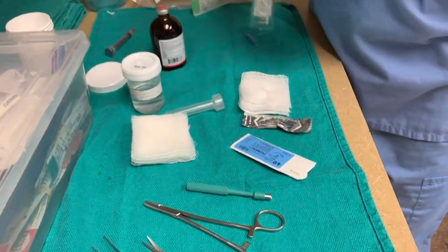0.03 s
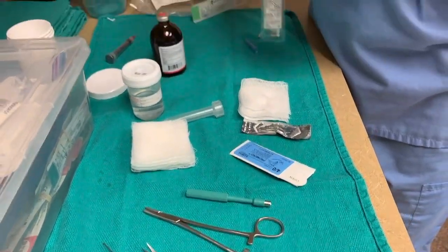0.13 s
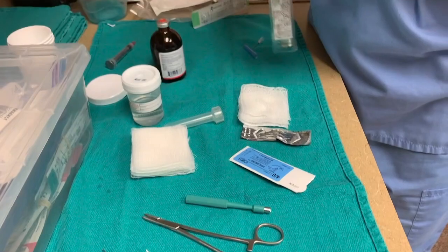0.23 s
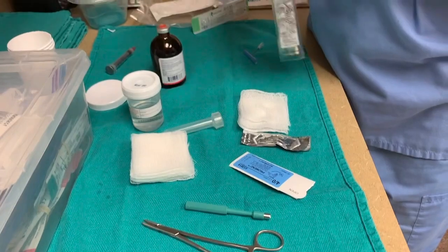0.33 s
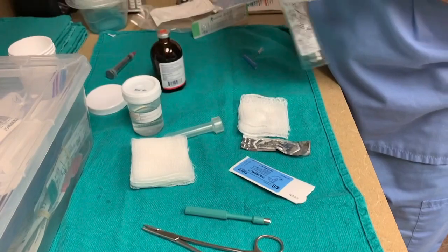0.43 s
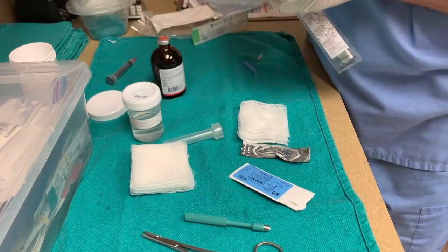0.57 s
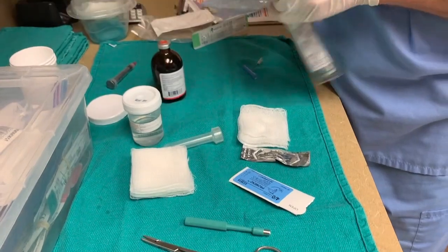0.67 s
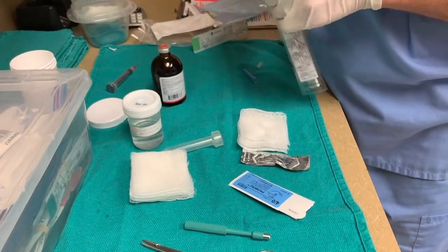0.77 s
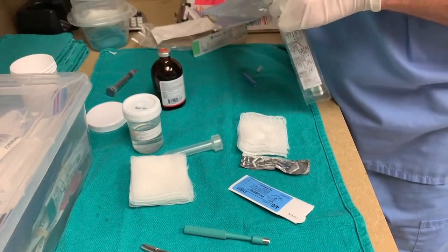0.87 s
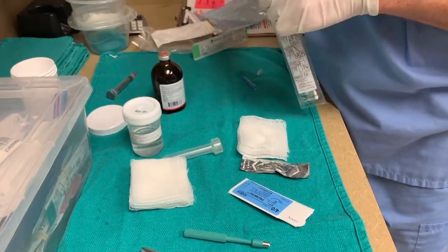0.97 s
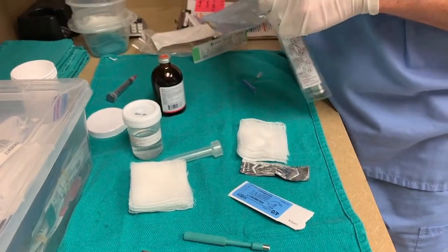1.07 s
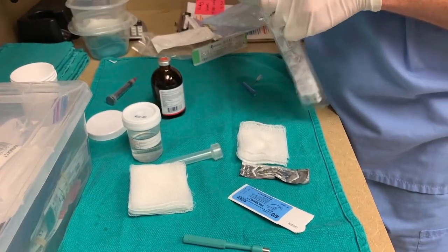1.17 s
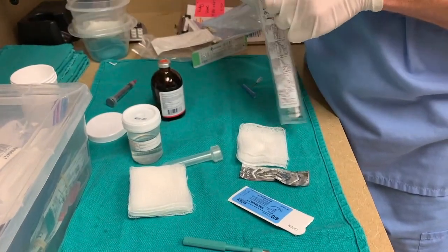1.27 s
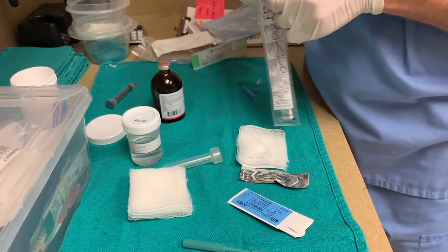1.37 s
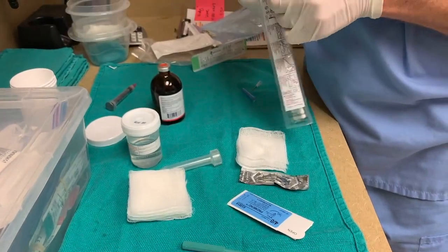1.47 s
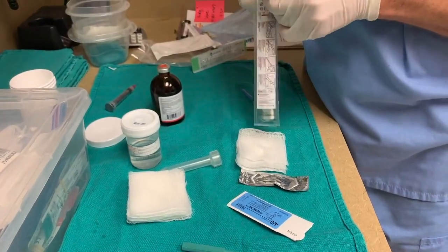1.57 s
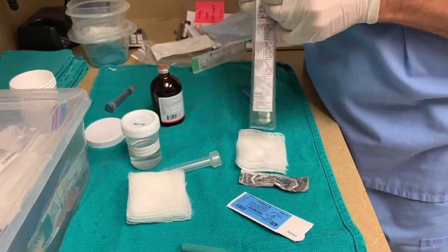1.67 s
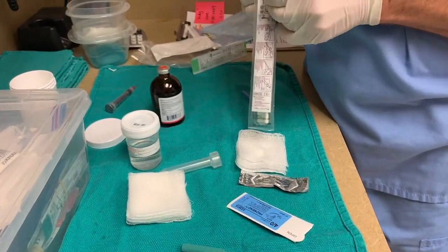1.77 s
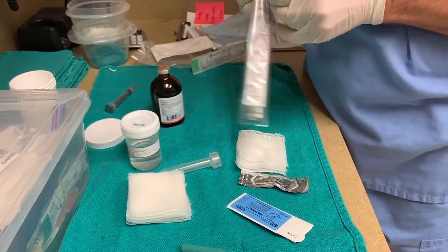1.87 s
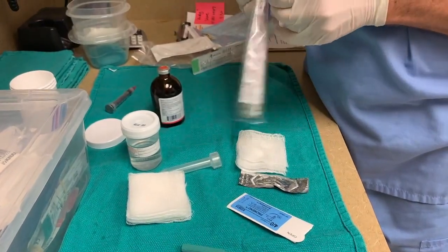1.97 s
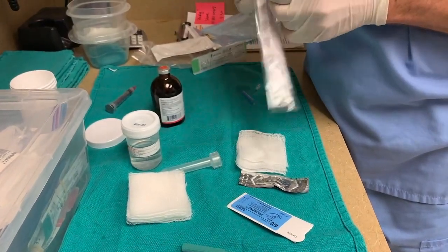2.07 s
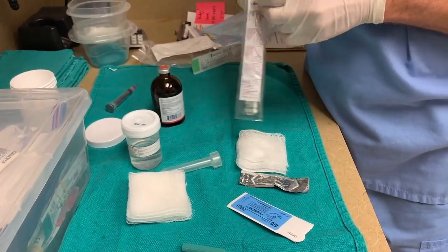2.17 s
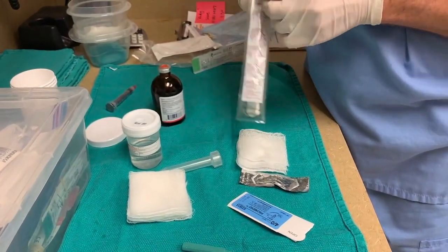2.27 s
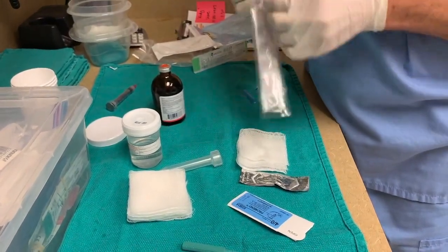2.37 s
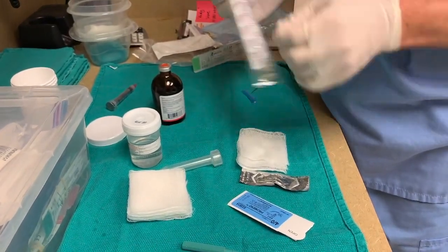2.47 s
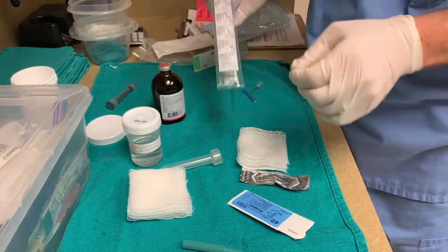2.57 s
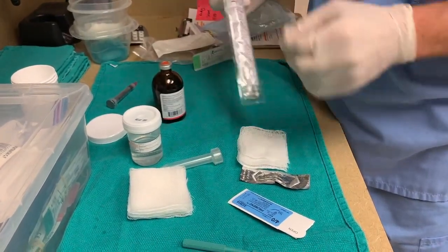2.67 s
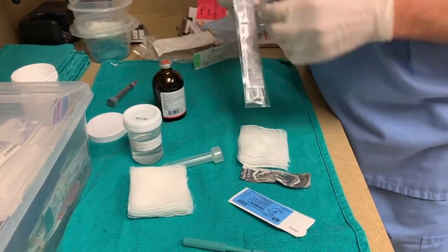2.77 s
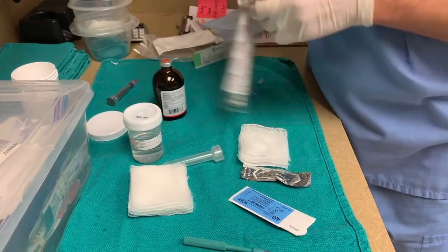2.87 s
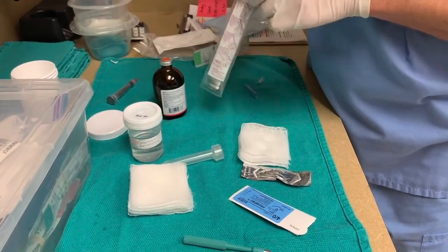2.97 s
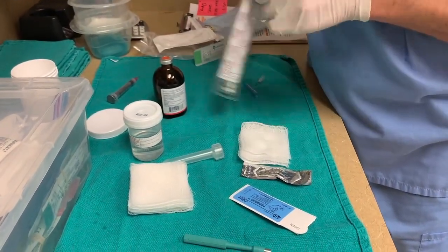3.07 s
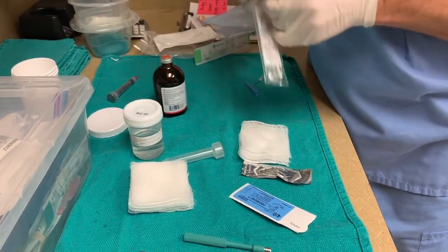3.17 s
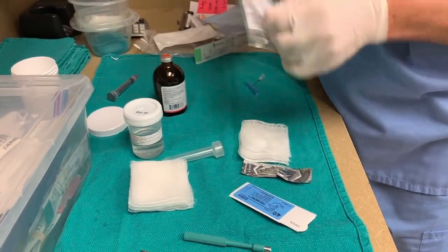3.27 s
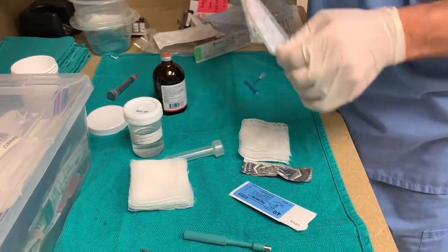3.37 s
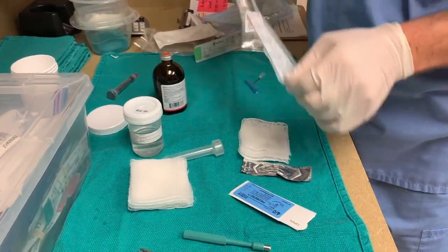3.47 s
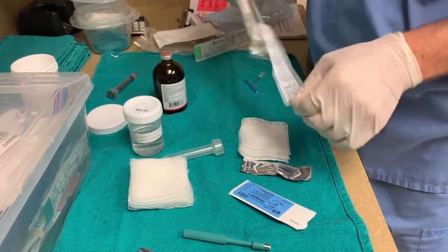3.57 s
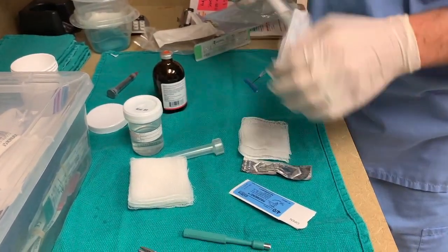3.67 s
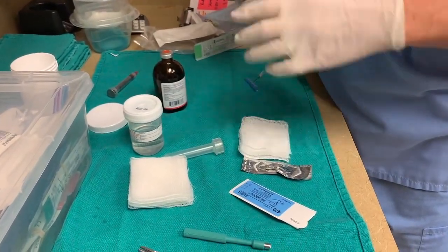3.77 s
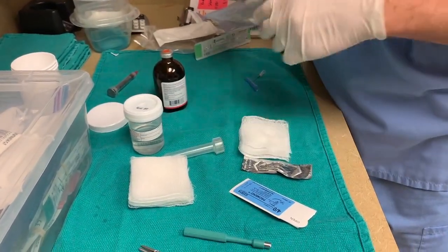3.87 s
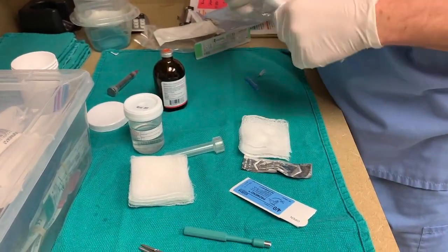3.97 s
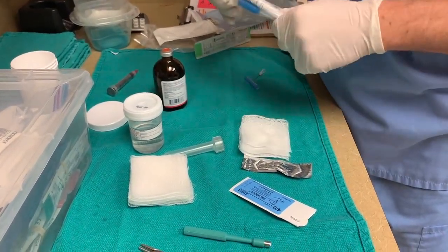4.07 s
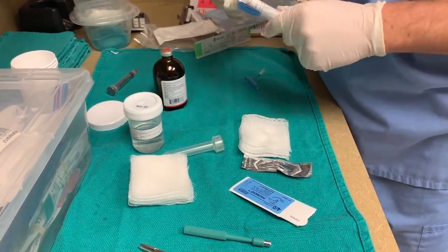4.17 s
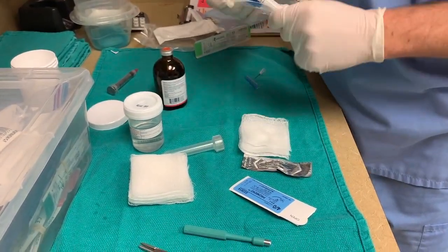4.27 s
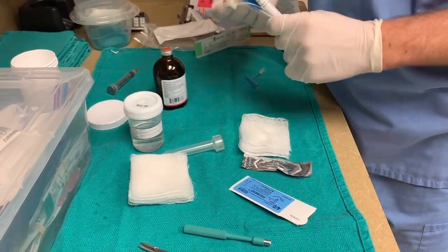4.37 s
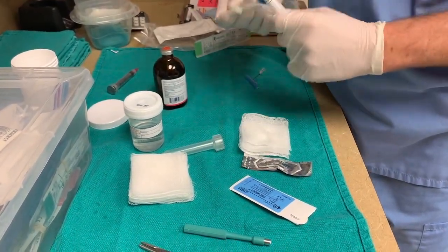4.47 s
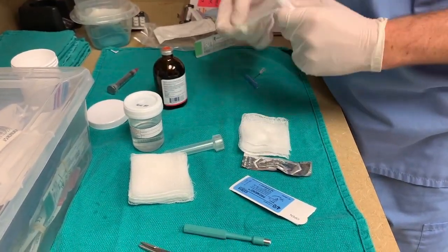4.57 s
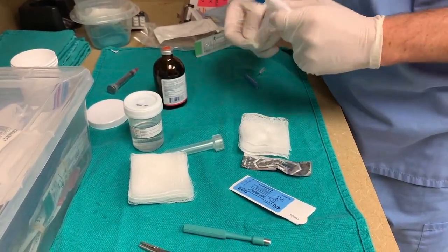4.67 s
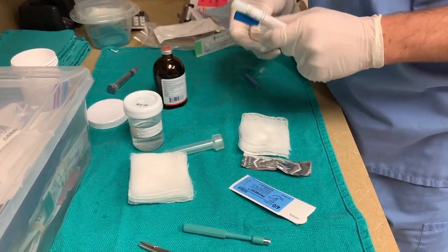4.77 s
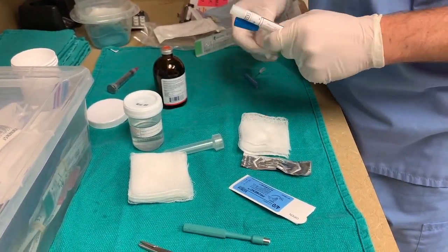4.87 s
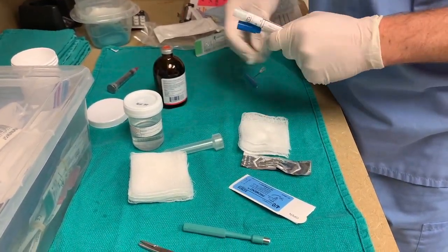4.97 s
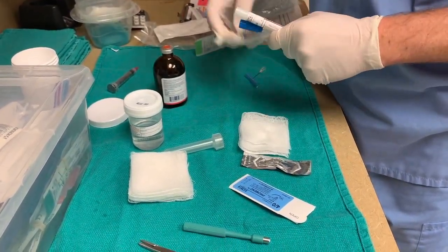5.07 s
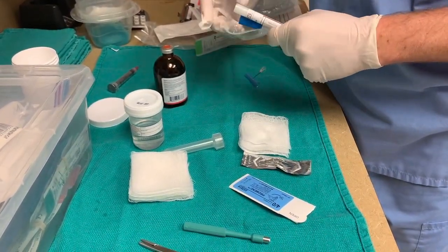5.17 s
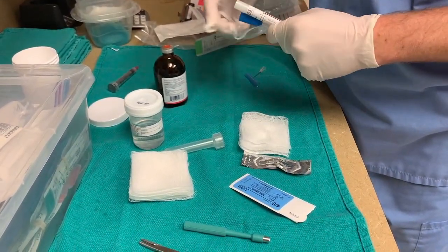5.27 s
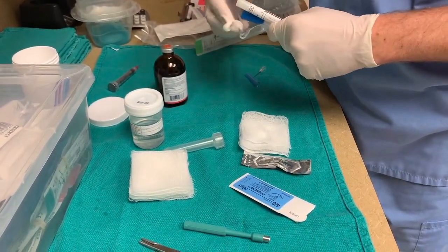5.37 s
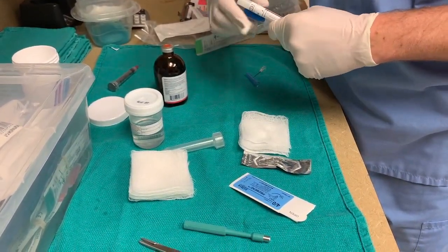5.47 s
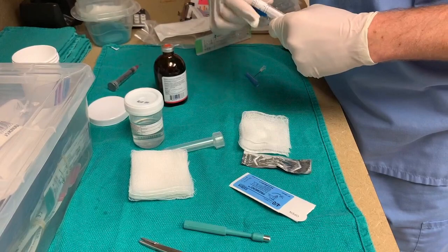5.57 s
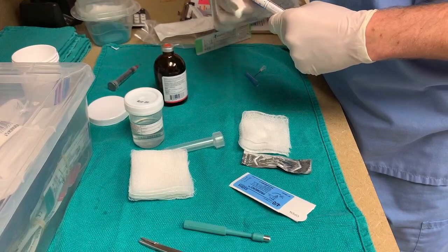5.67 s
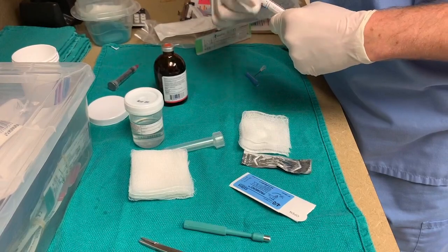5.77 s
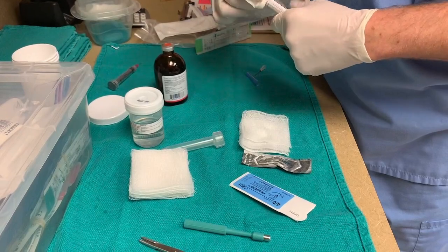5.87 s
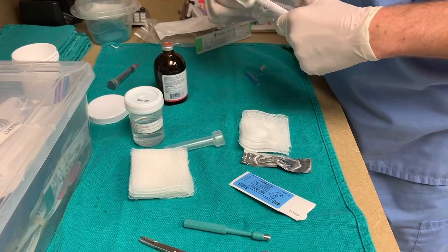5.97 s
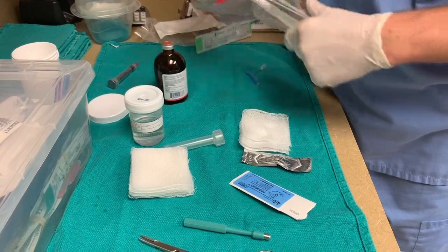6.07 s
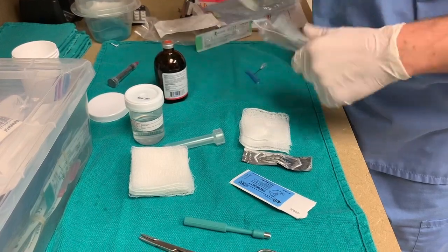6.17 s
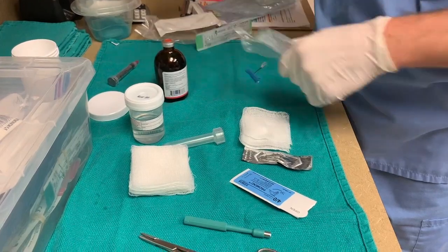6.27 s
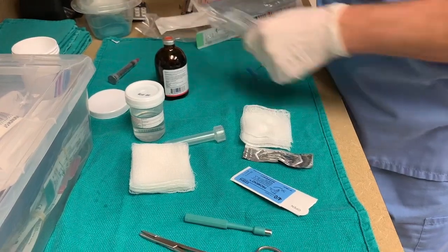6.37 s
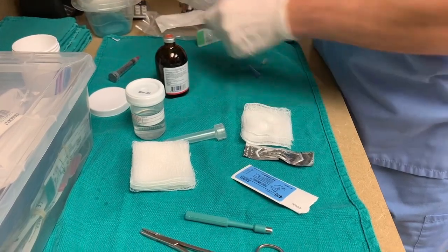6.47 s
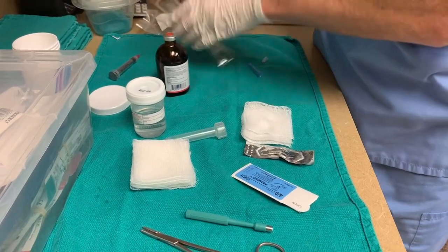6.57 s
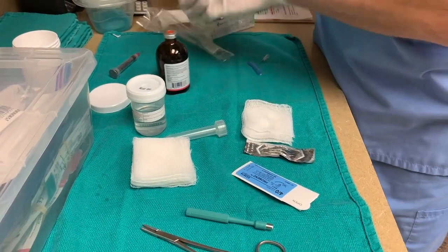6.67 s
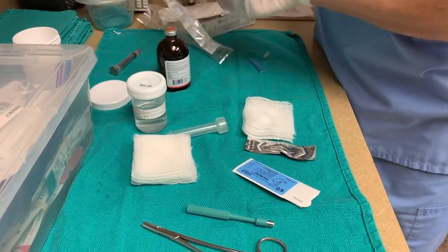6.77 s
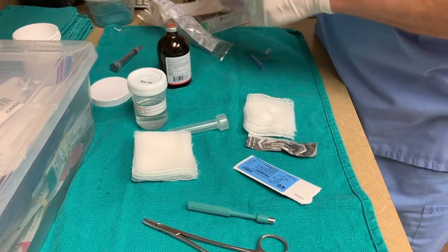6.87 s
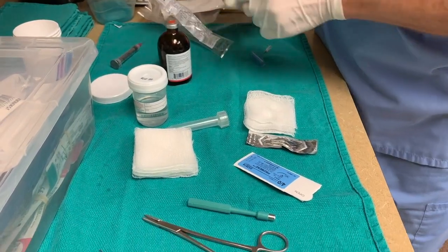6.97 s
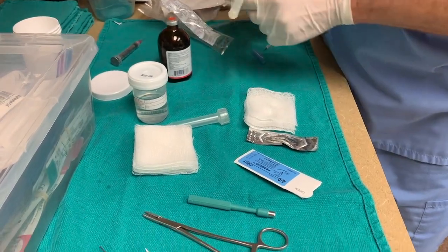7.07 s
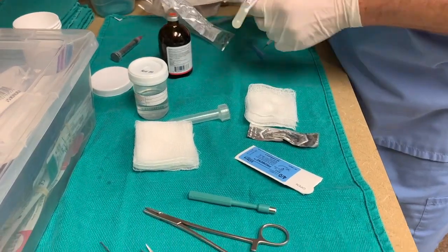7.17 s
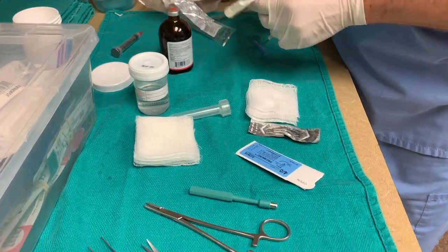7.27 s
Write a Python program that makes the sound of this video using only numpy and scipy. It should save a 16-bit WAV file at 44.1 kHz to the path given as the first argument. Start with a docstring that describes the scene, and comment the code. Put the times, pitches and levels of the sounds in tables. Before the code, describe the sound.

In a small, lightly reverberant clinic room, a steady low hum near 120 hertz sits over soft, deep ventilation rumble. Close and slightly right, gloved hands turn a stiff film-and-paper pouch. From 0 to 0.9 s there are light, separated crinkles and ticks, then near quiet until 1.45. Snaps gather and sharpen from 1.5 to 2.35, with a tiny squeaky slip at 2.0. At 2.4 comes the loudest single crack, with a hollow sheet pop. A sparse gap follows, with one snap at 2.85. From about 3.1 to 3.4 the seal rips open: dense breaking fibres and a squeal gliding up, then down. Bright crackling, papery rustle and faint rubber scrapes continue from 3.45 to 4.8, densest around 4.5. A sharp snap lands at 5.1, another at 5.47, and a crackling cluster at 5.8-6.3 with a muted pop. Small soft crinkles and a slight rub fade by 6.8, leaving the hum.

```python
"""A small clinic room: gloved hands turn a sterile paper-and-film pouch and peel it open, right of a two-port phone.
The stiff film buckles in sharp snaps, made of filtered noise and ringing facets, amid crinkle from tiny random creases.
The seal parts in a gliding stick-slip squeal and a rush of breaking fibres; gloves scrape and the taut sheet pops.
Reverberation of shaped noise surrounds the pouch, over a hum tone and low-heavy noise for the ventilation."""
import sys
import numpy as np
from scipy import signal
from scipy.fft import rfft, irfft, next_fast_len
from scipy.io import wavfile
from scipy.ndimage import uniform_filter1d

SR = 44100
rng = np.random.default_rng(int(sys.argv[2]) if len(sys.argv) > 2 else 0)


def master(y):
    """Save y as 16-bit WAV."""
    cut = np.clip(np.atleast_2d(y).T, -1, 1)
    pcm = np.round(cut * 32767)  # scale
    wavfile.write(sys.argv[1], SR, pcm.astype(np.int16))


N = 322371
TIME = np.arange(N) / SR

# Colour of the sheet's body. Each row: frequency in Hz, level in dB.
BODY_COLOUR = [(100, -24.5), (220, -8), (400, 0.5), (540, 5.5), (660, -7.5), (800, 3.5), (1200, 11),
               (1600, 3.5), (3000, -38)]
# Centres of the overlapping noise bands, in Hz.
BAND_HZ = [250, 600, 1200, 2200, 3800, 6500, 10000, 15000]
# How alike sound from the crumpled sheet is at the two ports. Each row: frequency in Hz, likeness from 0 to 1.
LIKENESS = [(150, .95), (500, .78), (1200, .68), (2200, .45), (4000, .36), (6500, .3), (8500, .6),
            (10500, .85), (14000, .9)]


def snaps(body_db=-4.0, crack_db=0, edge_db=-1, facet_db=-4, main_db=-3, spike_db=-4,
          lead_db=-15, lead_s=0.0034, lead_edge_db=-7):
    """Each crease has a soft noise lead-in, buckles with a crack, rings one large and several lesser facets."""
    # Buckles of the film. Each row: start in seconds, crack level in dB, sheet body and bright edge
    # in dB relative to the crack before the common trims above, facet pitch in Hz.
    buckles = [(0.071, -58.5, -10, -0.5, 3080), (.161, -65, -22, 5, 3860), (.281, -41.5, -8, -7, 1950),
               (0.3294, -52.5, -10, 8, 4860), (0.343, -46, 1, 9, 4320), (.458, -45, -5, -2, 3440),
               (0.52, -45, -9, -4.5, 3530), (0.575, -59.5, -1, -19, 2380), (0.5948, -57.5, -3, 2, 3900),
               (0.6918, -42, -10, 2, 2410), (0.7181, -47.5, -4, 11.5, 4650), (.778, -38.5, -9, -9.5, 3100),
               (0.8807, -53.5, -5, -1.5, 3000), (1.084, -61.5, -16, 3.5, 1200),
               (1.254, -54, -31, -34, 2510), (1.467, -45.5, 3.5, -6.5, 1790), (1.507, -39.5, -18, -5, 3100),
               (1.529, -50.5, -6, 16, 4600), (1.569, -39, -30, -6.5, 2600), (1.616, -36, -4, -11, 1910),
               (1.775, -54.5, -4, -4.5, 3000), (1.827, -41.5, -4, 5, 3260), (1.837, -43, -6, -9, 3640),
               (1.917, -46, -12, -14, 1880), (1.8514, -30.5, -6.5, -1.5, 2120),
               (1.9782, -34, -1, -13, 4240), (2.022, -38.5, -6.5, 4, 1080), (2.034, -38.5, -18.5, -1, 3030),
               (2.064, -40, -8, -4, 4430), (2.12, -38.5, -12, -9, 3550), (2.1274, -33, -11.5, 7.5, 4260),
               (2.149, -41, 0.5, -15, 2570), (2.267, -47.5, -0.5, 4.5, 2800), (2.3455, -34, -9.5, 0, 3400),
               (2.375, -21.5, 0.5, 0, 3340), (2.418, -34.5, -7, 8.5, 3740),
               (2.5538, -45, -19.5, -4.5, 2200), (2.848, -36, -3.5, -1, 2680), (2.986, -67, 2, 12, 3000),
               (3.023, -57.5, 2, 15.5, 4200), (3.039, -50, -8, 3, 2560), (3.057, -39, -3, 0.5, 2190),
               (3.0913, -38, -1.5, -1, 2860), (3.174, -36.5, -15, 10, 2210), (3.299, -38, -1, 18.5, 3600),
               (3.315, -32.5, -16, 16.5, 3100), (3.3204, -32.5, -11, 16, 3245),
               (3.483, -34.5, -1, -6, 4050), (3.502, -40.5, 5, 7, 3570), (3.568, -52.5, -6, 3, 2080),
               (3.602, -45, -6, -20, 1830), (3.6343, -39, -2, 1.5, 3050), (3.707, -38, -5.5, -3.5, 3880),
               (3.727, -42.5, 3, 2.5, 3050), (3.744, -48.5, -13, 7, 4270), (3.79, -55.5, 6, 4, 1690),
               (3.8356, -53.5, -8, 7, 1720), (3.8773, -46.5, 2, .5, 3050), (3.899, -42, 0, 2.5, 2220),
               (3.913, -39, -5.5, 6, 3320), (3.971, -47.5, -8, 6, 3200), (3.9984, -40.5, -5, 6, 3260),
               (4.073, -55, -2, 9, 3240), (4.1365, -42, -7, 7.5, 4520), (4.166, -47, -6, 1, 3060),
               (4.204, -46.5, -4.5, 2, 4300), (4.227, -42, -5, -2, 3220), (4.252, -42, -27, 8.5, 5700),
               (4.306, -40.5, -7, -4, 2210), (4.3128, -37, 1, 1, 2770), (4.391, -50.5, -10, 7.5, 4050),
               (4.473, -44.5, 0.5, 6.5, 3230), (4.4964, -35, -1, 2, 5160), (4.5017, -33.5, -27, 3.5, 1440),
               (4.5389, -36, -6.5, 3.5, 3750), (4.553, -42, 4, 0.5, 2030), (4.577, -42.5, -2, 6, 1280),
               (4.612, -40, -13, 2, 2980), (4.6365, -37.5, -17, -0.5, 2000), (4.664, -45, -12, 8.5, 2720),
               (4.675, -42.5, -13, 9, 1900), (4.699, -42, -7, 9, 2200), (4.719, -38, -21, -15, 3900),
               (4.737, -47, -8, 9, 1960), (4.7465, -38.5, 2, 9, 2700), (4.754, -36.5, -10, -0.5, 3160),
               (4.792, -45, -7, 6, 2680), (4.974, -49, -5, 7.5, 6500), (4.995, -47, -0.5, -4, 1850),
               (5.046, -55, -0.5, 14.5, 4970), (5.0769, -42.5, -12, 7.5, 2110),
               (5.101, -31.5, -6.5, -0.5, 3740), (5.1415, -41.5, -16.5, 8, 2120),
               (5.178, -50.5, -10.5, 2, 1830), (5.23, -48, -16, 4, 4170), (5.272, -54, -12, 13.5, 4760),
               (5.3978, -49.5, -12, 7, 6020), (5.4286, -45.5, -6, 5.5, 4650), (5.463, -46, -10.5, 12, 5340),
               (5.472, -34, -4, -0.5, 2220), (5.562, -52, -20, 7, 3800), (5.641, -49, -4.5, -4, 1820),
               (5.7167, -50, -4, 1.5, 3170), (5.757, -53, -23, 4, 4400), (5.769, -44, -19, -1, 2740),
               (5.8085, -41, -7, -11, 1960), (5.858, -38.5, -6, -13, 3700), (5.9256, -40, -6, 5.5, 4090),
               (5.965, -42.5, -8.5, 1, 2340), (5.981, -37, -5, -9, 3100), (5.9932, -31.5, -3, -14, 4000),
               (6, -42.5, -5, -1, 3320), (6.029, -33.5, -11.5, 0.5, 4160), (6.072, -56, -5, 13, 3900),
               (6.0946, -38, -4, 7, 5800), (6.112, -42, -7.5, -7, 3100), (6.138, -43.5, -1.5, 6, 3740),
               (6.2122, -37, -11, 2, 2270), (6.2294, -46, -1.5, 7.5, 2200), (6.2728, -44, -15, -1, 4300),
               (6.43, -61.5, -2, 3.5, 1780), (6.459, -55.5, 2.5, -4, 1970), (6.5407, -57.5, 6, 13, 2350),
               (6.581, -51.5, -2, 1, 2680), (6.602, -41.5, -10, -11, 4680), (6.626, -51.5, 1, -1, 1580),
               (6.736, -43, -0.5, 7.5, 2560), (6.804, -51, -1.5, -8, 2570)]
    # Colours of the crack and its bright edge. Each row: frequency in Hz, level in dB.
    crack_colour = [(600, -35.5), (1100, -3), (1600, -5), (2500, 0.5), (3300, 0.5), (4400, -0.5),
                    (5800, -14.5), (7500, -10.5), (11000, -49)]
    edge_colour = [(3500, -30.5), (5500, 2), (7000, -2), (10000, 2.5), (11800, -1.5), (13300, 4),
                   (14700, -6.5), (16000, -4.5)]
    facet_octaves = .5  # scatter of the lesser facets about the main one
    facet_sag = 0.047  # share of its pitch that the main facet loses as it flattens
    facet_cycles = 6  # cycles for a ring to die by a factor of e
    out = np.zeros((2, N))
    t = np.arange(SR // 25) / SR
    body, crack, edge = colour(BODY_COLOUR), colour(crack_colour), colour(edge_colour)
    noises = np.split(port_noise(len(t) * len(buckles)).sum(axis=0), len(buckles), axis=1)
    for (s, db, low_db, high_db, hz), noise in zip(buckles, noises):
        # six lesser facets, mixed differently at each port
        facet_hz = hz * 2 ** (facet_octaves * rng.standard_normal(size=(6, 1)))
        mix = rng.standard_normal((2, len(facet_hz)))
        ring = unit(mix @ (np.sin(2 * np.pi * facet_hz * t) * np.exp(-t * facet_hz / facet_cycles)))

        # the main facet, out of step between the ports
        phase = rng.uniform(-1, 1) * np.pi / 3 * np.array([[1], [-1]])
        main_s = facet_cycles / hz
        turns = hz * np.cumsum(1 + facet_sag * (np.exp(-t / main_s) - .5)) / SR
        envelope = (1 - np.exp(-t * hz / 2)) * np.exp(-t / main_s)
        main = unit(np.sin(2 * np.pi * turns + phase) * envelope)

        low_burst = burst(noise, rise_s=0.0017, fast_s=0.005, slow_s=0.0087, slow_db=-17)
        low = unit(convolve(low_burst, body))
        mid_burst = burst(noise, rise_s=0.0045, fast_s=0.00051, slow_s=0.0086, slow_db=5.5)
        mid = unit(convolve(mid_burst + undb(facet_db) * ring, crack))
        mid = unit(mid + undb(main_db) * main)
        high_burst = burst(noise, rise_s=.0006, fast_s=.001, slow_s=.005, slow_db=-14)
        high = unit(convolve(high_burst, edge))
        snap = undb(low_db + body_db) * low + undb(crack_db) * mid + undb(high_db + edge_db) * high
        snap = undb(db) * snap * np.sqrt(0.0094 * SR)  # levels are means over a nominal 9.4 ms

        # the instant of release is a spike that grows with the bright edge
        spike = convolve(noise * np.exp(-((t - .0006) / .0003) ** 2), edge)
        add(out, s, snap + undb(db + high_db + spike_db) * spike / np.max(np.abs(spike)))

        # a short noise swells up to each snap's start
        lead_in = noise[:, ::-1] * np.exp(-t[::-1] / lead_s)
        lead_in = unit(convolve(lead_in, crack)) + undb(high_db + lead_edge_db) * unit(convolve(lead_in, edge))
        add(out, s - t[-1], undb(lead_db) * unit(lead_in) * np.sqrt(np.sum(snap ** 2) / 2))
    return out


def pulls(body_db=-4, fibre_db=-2.0, edge_db=-3.0, ring_db=-6.0, squeal_db=-2):
    """Under tension the pouch sticks and slips with a gliding squeal; many fibres let go and ring the taut film."""
    # Surges of the parting seal: each pull stretches the film until it slips. Each row: start in seconds,
    # hold in seconds, level in dB, then relative to it, before the common trims above,
    # paper body in dB, bright edge in dB, squeal in dB.
    surges = [(1.976, 0.036, -34, -8.5, -8, -4.5), (2.402, 0.024, -29.5, -5, 0.5, -7.5),
              (3.16, 0.019, -24, -11.5, -2.5, -7), (3.187, 0.028, -25, -14.5, -5, -4),
              (3.229, 0.039, -21.5, -15.5, 3.5, -0.5), (3.281, 0.011, -26, -10.5, 0.5, 7),
              (3.299, 0.012, -24.5, -5.5, -5, -7), (3.319, 0.013, -27, -14, -7.5, 8.5),
              (3.348, 0.012, -31, -10, -9, -1), (3.377, 0.013, -29, -3.5, -10, -3.5)]
    # The film squeals higher the faster it slips. Each row: time in seconds, slips per second in Hz.
    slip_pace = [(1.98, 1850), (2.01, 1650), (2.025, 1100), (2.39, 2100), (2.405, 1850), (2.425, 1800),
                 (3.14, 1700), (3.172, 1530), (3.184, 2200), (3.22, 2300), (3.255, 2750), (3.285, 3550),
                 (3.3, 3650), (3.318, 3100), (3.335, 2950), (3.355, 2400), (3.374, 1350), (3.39, 950)]
    # Colours of the breaking fibres and their bright edge. Each row: frequency in Hz, level in dB.
    fibre_colour = [(600, -24.5), (1100, 0.5), (1700, -7.5), (2600, 5.5), (3300, 6), (4400, 2), (5800, -15),
                    (7500, -20), (11000, -30)]
    fibre_edge_colour = [(3500, -42.5), (5500, 4), (7000, 0), (9000, 2), (11000, -5.5), (13500, -6),
                         (16000, -20)]
    out = np.zeros((2, N))
    t = np.arange(-SR // 20, SR // 5) / SR
    layer_colours = (BODY_COLOUR, fibre_colour, fibre_edge_colour)
    for s, hold_s, db, low_db, high_db, slip_db in surges:
        force = undb(db) * swell(t, hold_s, attack_s=0.016, release_s=0.0032)
        breaks = grains(len(t), rate=1700, spread_db=1.4, patchy_db=4.5, ring_s=0.00097)
        body, fibres, edge = (even(convolve(breaks, colour(c)), even_s=0.023) for c in layer_colours)
        tearing = undb(body_db + low_db) * body + undb(fibre_db) * fibres + undb(edge_db + high_db) * edge

        hz = np.interp(s + t, *np.transpose(slip_pace))
        ring = facets(hz, rate=330, octaves=.17, cycles=13, spread_db=4)
        tone = squeal(hz, jitter=.05, steady_s=.0016, octave_db=-7)
        slip = undb(ring_db) * even(ring, even_s=0.018) + undb(squeal_db) * tone
        add(out, s + t[0], force * (tearing + undb(slip_db) * slip))
    return out


def handling(crinkle_db=-0.5, facet_db=-5, rustle_db=-2, facet_hz=2700, paper_hz=800):
    """Small creases give way and facets flip in the film while the paper back crumples lower down."""
    # Each grip of the fingers crumples the pouch. Each row: start in seconds, hold in seconds,
    # film crinkle in dB, paper rustle in dB, both before the common trims above.
    grips = [(0.325, 0.065, -52.5, -64), (0.457, 0.12, -75, -78), (0.712, 0.2, -64.5, -75),
             (1.505, 0.12, -56, -71), (1.843, 0.025, -42, -56), (2.01, 0.16, -59, -58),
             (2.21, 0.15, -59, -71), (2.361, 0.045, -59, -55), (2.849, 0.095, -52.5, -60),
             (3.02, 0.11, -57, -70), (3.118, 0.22, -41, -48.5), (3.456, 0.06, -42.5, -51),
             (3.563, 0.12, -58.5, -58.5), (3.697, 0.025, -52, -55), (3.888, 0.12, -48, -53.5),
             (4.145, 0.28, -52.5, -59.5), (4.485, 0.28, -44.5, -51.5), (4.806, 0.18, -58, -63.5),
             (4.987, 0.031, -54, -55.5), (5.062, 0.045, -61, -57), (5.413, 0.054, -58, -65),
             (5.788, 0.1, -59, -59.5), (5.951, 0.13, -46, -51.5), (6.168, .04, -56, -61),
             (6.427, 0.13, -60.5, -65.5), (6.554, .14, -60.5, -59)]
    # Colour of the creasing film. Each row: frequency in Hz, level in dB.
    crinkle_colour = [(400, -6), (1000, -15), (1500, -6.5), (3000, 5.5), (4400, -1.5), (6500, -4),
                      (10000, -4), (13300, -5), (14500, -10), (16000, -13)]
    # the pouch stirs faintly between grips, before the same trims
    film_gain, paper_gain = undb(-80.5), undb(-91)
    for s, hold_s, film_db, paper_db in grips:
        pressure = swell(TIME - s, hold_s, attack_s=0.0074, release_s=0.019)
        film_gain = np.maximum(film_gain, undb(film_db) * pressure)
        paper_gain = np.maximum(paper_gain, undb(paper_db) * pressure)
    creases = grains(N, rate=520, spread_db=3.6, patchy_db=5.5, ring_s=.0012)
    creases = convolve(creases, colour(crinkle_colour))
    flips = facets(np.full(N, facet_hz), rate=280, octaves=.55, cycles=4.5, spread_db=4.4)
    paper = facets(np.full(N, paper_hz), rate=320, octaves=.6, cycles=1.7, spread_db=4.2)
    film = undb(crinkle_db) * even(creases, even_s=0.047) + undb(facet_db) * even(flips, even_s=0.057)
    return film * film_gain + undb(rustle_db) * even(paper, even_s=0.022) * paper_gain


def rubs(attack_s=.01, release_s=.006):
    """Rubber catches on paper in a short, low, hoarse scrape of unsteady stick and slip."""
    # A glove drags over the paper back. Each row: start in seconds, hold in seconds, level in dB, pitch in Hz.
    drags = [(3.282, 0.016, -38.5, 1150), (3.464, 0.022, -41.5, 1020), (3.514, 0.032, -43.5, 800),
             (4.7, 0.06, -48, 790), (5.08, 0.028, -44, 780), (6.63, 0.012, -63, 1500),
             (6.687, 0.0066, -50, 950)]
    out = np.zeros((2, N))
    t = np.arange(-SR // 20, SR // 5) / SR
    for s, hold_s, db, hz in drags:
        scrape = squeal(np.full(len(t), hz), jitter=.17, steady_s=.0015, octave_db=-13)
        add(out, s + t[0], undb(db) * swell(t, hold_s, attack_s, release_s) * scrape)
    return out


def flaps():
    """The taut sheet flaps like a drum skin: a short hollow pop that drops in pitch as it slackens."""
    # Each row: start in seconds, level in dB, pitch it settles at in Hz.
    pops = [(2.377, -25, 484), (2.4212, -31, 212), (2.4221, -27.5, 370), (5.102, -61.5, 560),
            (6.231, -40.5, 442), (6.609, -42, 290)]
    out = np.zeros(N)
    t = np.arange(SR // 10) / SR
    for s, db, hz in pops:
        turns = hz * (t + .0012 * (1 - np.exp(-t / .004)))  # starts 30 % sharp
        add(out, s, undb(db) * np.sin(2 * np.pi * turns) * np.exp(-t / .007))
    return out


def room(x, build_s=0.001):
    """The walls ring on smoothly, longest in the bass; the reflections change as the pouch moves about."""
    # Each row: frequency in Hz, time to decay by 60 dB in seconds, reverberation level in dB.
    reverberation = [(400, 0.41, -6.5), (1322, .3, -10.5), (3930, 0.24, -6.5), (8900, 0.19, -3.5),
                     (13900, 0.17, -18)]
    t = np.arange(SR // 3) / SR
    hop = SR // 4
    shapes = []
    for hz in BAND_HZ:
        decay = np.exp(-np.log(1000) * t / along(reverberation, hz))
        shape = unit(decay * (1 - np.exp(-t / build_s)))
        shapes.append([undb(along(reverberation, hz, 2)) * shape])
    out = x.copy()
    fade = np.sin(np.pi * np.arange(2 * hop) / (2 * hop))
    for start in range(0, N - hop, hop):
        part = x[1:, start:start + 2 * hop]  # the right channel feeds both sides of the reverberation
        response = np.sum(port_noise(len(t)) * shapes, axis=0)
        add(out, start / SR, signal.fftconvolve(part * fade[:part.shape[-1]], response, axes=-1))
    return out


def off_centre(x, corner_hz=3800):
    """Long waves reach both ports together; short ones reach the left later, and each port is shaded its own way."""
    # The phone's body shades the two ports unequally. Each row: frequency in Hz, left minus right in dB.
    port_shade = [(200, -4), (700, 1.8), (2000, -0.4), (4000, -0.4), (5700, -2), (8500, 0.5), (11000, -0.5),
                  (13500, .2)]
    port_lag = 13  # samples, approached well above the corner
    size = next_fast_len(N + SR // 10, True)
    hz = np.arange(size // 2 + 1) * SR / size
    lag_s = port_lag / SR * (1 - np.exp(-(hz / corner_hz) ** 2))
    shade = undb(along(port_shade, hz) / 2)
    left_right = np.array([shade * np.exp(-2j * np.pi * hz * lag_s), 1 / shade])
    return irfft(rfft(x, size) * left_right, size)[:, :N]


def clinic(air_db=-48.0, hum_db=-48.0, hum_hz=120.3, right_db=2, apart_db=-2):
    """A transformer hums over the ventilation; the rumble is alike at both ports, the hiss is not."""
    # Colour of the ventilation. Each row: frequency in Hz, level in dB.
    air_colour = [(15, -43), (30, -16), (50, -10.5), (60, -5), (72, 4.5), (86, -7), (110, -4), (150, -15.5),
                  (280, -24.5), (500, -36), (900, -48), (1350, -41), (2000, -47.5), (4000, -57),
                  (14000, -63), (16000, -76)]
    common, apart = convolve(rng.standard_normal((2, N)), colour(air_colour, size=16384))
    apart_colour = colour([(60, -12.5), (300, -0.5), (1500, 3.0), (16000, 1.5)])
    apart = convolve(apart, apart_colour)[0] * undb(apart_db)
    waver_db = .5 * np.interp(TIME, np.arange(30) / 4, rng.standard_normal(30))
    hum = np.sqrt(2) * undb(hum_db + waver_db) * np.sin(2 * np.pi * hum_hz * TIME)
    both = undb(air_db) * np.array([common + apart, common - apart]) + hum
    return both * undb(np.array([[-right_db], [right_db]]) / 2)  # the right port is the louder


def burst(noise, rise_s, fast_s, slow_s, slow_db):
    """A noise burst of unit energy with a chosen rise and a fast and a slow decay."""
    t = np.arange(noise.shape[-1]) / SR
    decay = np.exp(-t / fast_s) + undb(slow_db) * np.exp(-t / slow_s)
    return unit(noise * (1 - np.exp(-t / rise_s)) * decay)


def grains(length, rate, spread_db, patchy_db, ring_s):
    """Tiny fractures of very unequal size, rate per second, each with a colour of its own."""
    fires = np.flatnonzero(rng.random(length) < rate / SR)
    sizes_db = spread_db * np.minimum(rng.exponential(size=len(fires)), 4)
    tints_db = patchy_db * np.clip(rng.standard_normal((len(fires), len(BAND_HZ))), -2, 2)
    out = np.zeros((2, length))
    for hz, tint_db, noise in zip(BAND_HZ, tints_db.T, port_noise(length)):
        energy = np.zeros(length)
        energy[fires] = undb(sizes_db + tint_db) ** 2
        # low notes of the sheet ring longer; ring_s holds at 4 kHz
        keep = np.exp(-2 / (SR * ring_s * np.sqrt(4000 / hz)))
        out += noise * np.sqrt(signal.lfilter([1 - keep], [1, -keep], energy + 1e-18))
    return out


def facets(centre_hz, rate, octaves, cycles, spread_db):
    """Small flat patches flip over, each ringing for a few cycles at its own pitch near centre_hz."""
    out = np.zeros((2, len(centre_hz)))
    t = np.arange(SR // 50) / SR
    fires = np.flatnonzero(rng.random(len(centre_hz)) < rate / SR)
    draws = np.clip(rng.standard_normal((len(fires), 3)), -2, 2)
    for i, (pitch, size, skew) in zip(fires, draws):
        hz = centre_hz[i] * 2 ** (octaves * pitch)
        # each patch faces its own way, so the ports hear it out of step
        phase = skew * np.sqrt(-np.log(along(LIKENESS, hz)) / 2) * np.array([[1], [-1]])
        ring = np.exp(-t * hz / cycles) * (1 - np.exp(-t * hz))
        add(out, i / SR, undb(spread_db * size) * ring * np.sin(2 * np.pi * hz * t + phase))
    return out


def squeal(hz, jitter, steady_s, octave_db):
    """Unsteady stick and slip: a rough tone and its octave, whose pace and strength wander."""
    wander = uniform_filter1d(rng.standard_normal((3, len(hz))), int(steady_s * SR) + 1)
    pace, *strength = unit(wander) * np.sqrt(len(hz))
    phase = 2 * np.pi * np.cumsum(hz * (1 + jitter * pace)) / SR
    return (1 + np.array(strength) / 2) * (np.sin(phase) + undb(octave_db) * np.sin(2 * phase))


def swell(t, hold_s, attack_s, release_s):
    """Pressure builds up to t = 0, holds, then dies away."""
    return np.clip(1 + t / attack_s, 0, 1) ** 2 * np.exp(-np.maximum(t - hold_s, 0) / release_s)


def even(x, even_s):
    """The hands feed in energy steadily, however it is shared among the fractures; rms near one."""
    power = uniform_filter1d(np.mean(x ** 2, axis=0), int(even_s * SR) + 1)
    return x / np.sqrt(np.abs(power) + np.mean(power) / 100 + 1e-30)


def port_noise(length):
    """White noise at the two ports, split into overlapping bands: bands x ports x length."""
    size = next_fast_len(length, True)
    hz = np.arange(size // 2 + 1) * SR / size
    likeness = along(LIKENESS, hz)
    gains = np.sqrt([(1 + likeness) / 2, (1 - likeness) / 2])
    common, apart = rfft(rng.standard_normal((2, size))) * gains
    pair = np.array([common + apart, common - apart])
    shares = (along(np.transpose([BAND_HZ, row]), hz) for row in np.eye(len(BAND_HZ)))
    return np.array([irfft(pair * share, size)[:, :length] for share in shares])


def along(points, hz, column=1):
    """Read a table of rows (Hz, ..) on a log-frequency axis."""
    points = np.array(points)
    return np.interp(np.log(np.maximum(hz, 1)), np.log(points[:, 0]), points[:, column])


def colour(points, size=1024):
    """Causal minimum-phase response of unit energy whose spectrum has the shape of the (Hz, dB) rows."""
    hz, db = np.transpose(points)
    bins = np.maximum(np.arange(size // 2 + 1) * SR / size, 1)
    cepstrum = irfft(np.log(undb(np.interp(np.log(bins), np.log(hz), db))))
    # fold the cepstrum onto positive times
    cepstrum[1:size // 2] *= 2
    cepstrum[size // 2 + 1:] = 0
    return unit(irfft(np.exp(rfft(cepstrum))))


def convolve(x, response):
    """Filter each channel, keeping the length."""
    return signal.fftconvolve(np.atleast_2d(x), np.atleast_2d(response), axes=-1)[:, :x.shape[-1]]


def unit(x):
    """Scale each channel to an energy of one."""
    return x / np.sqrt(np.sum(x ** 2, axis=-1, keepdims=True) + 1e-30)


def undb(db):
    """Decibels to gain."""
    return 10 ** (np.asarray(db) / 20)


def add(track, s, sound):
    """Mix a sound into a track at time s in seconds."""
    part = track[..., max(int(s * SR), 0):][..., :sound.shape[-1]]
    part += sound[..., :part.shape[-1]]


def scene():
    """The pouch, a little to the right, in the humming room."""
    pouch = snaps() + handling() + pulls() + rubs() + flaps()
    return off_centre(room(pouch)) + clinic()


def record(dry):
    """The phone cuts the top, steeply above 15.8 kHz."""
    return signal.sosfilt(signal.ellip(10, .2, 80, 15800, fs=SR, output="sos"), dry)


dry = scene()
out = record(dry)
master(out)
```